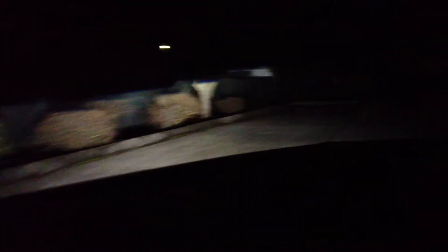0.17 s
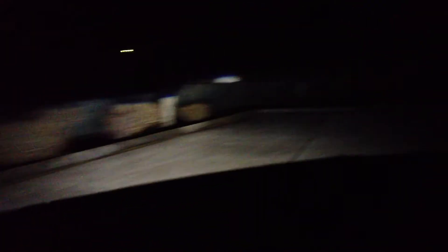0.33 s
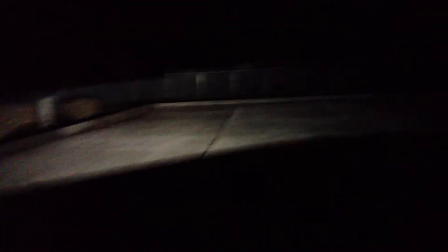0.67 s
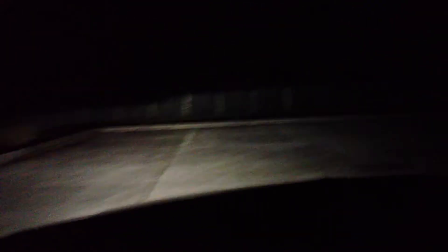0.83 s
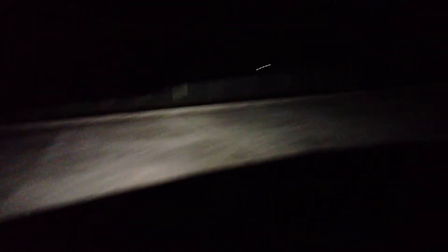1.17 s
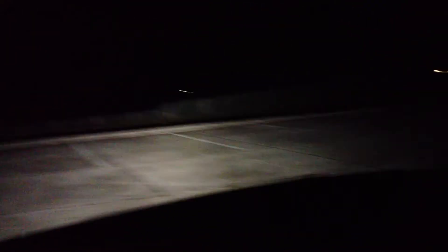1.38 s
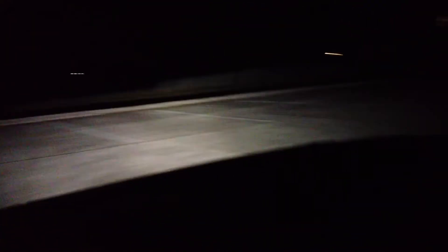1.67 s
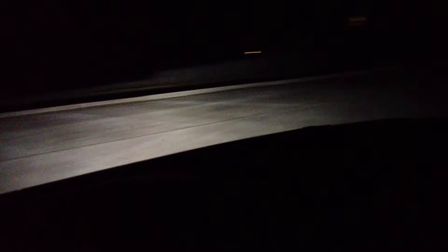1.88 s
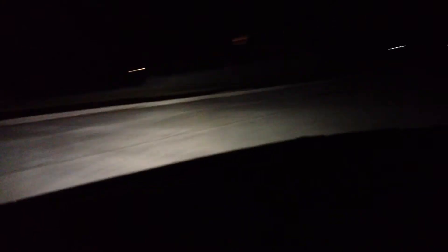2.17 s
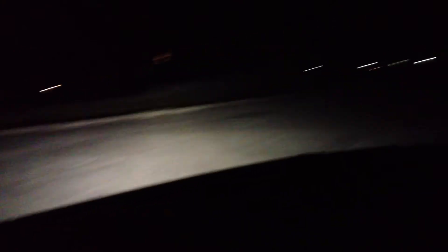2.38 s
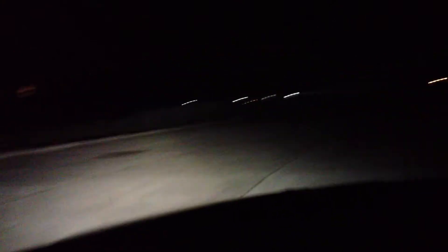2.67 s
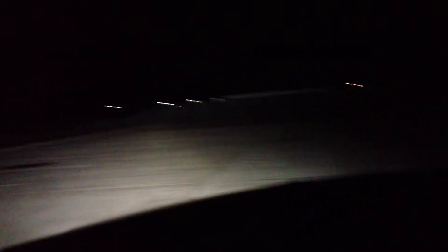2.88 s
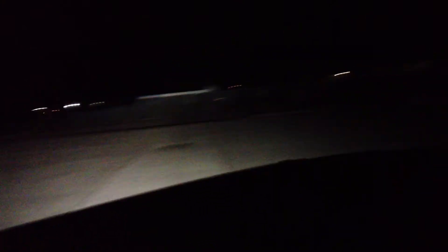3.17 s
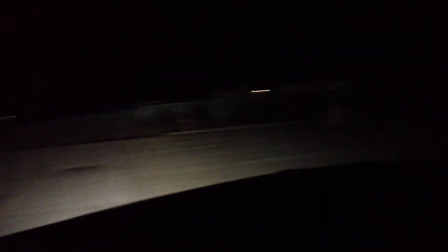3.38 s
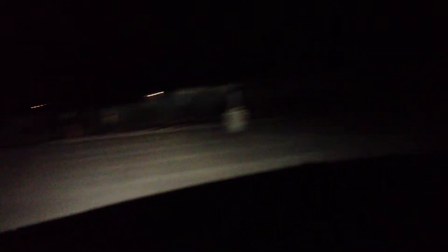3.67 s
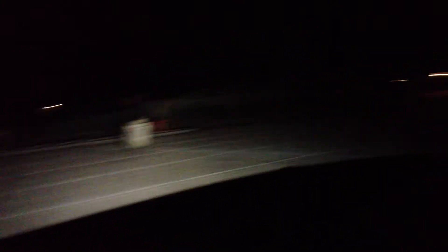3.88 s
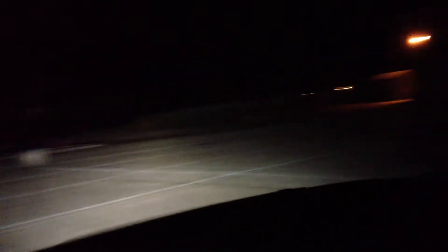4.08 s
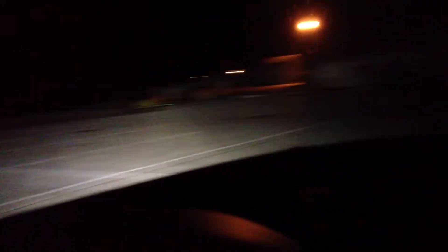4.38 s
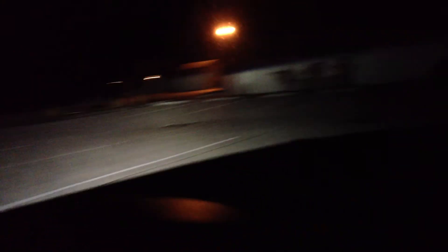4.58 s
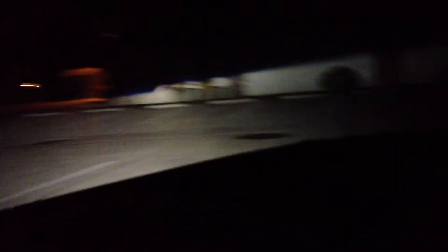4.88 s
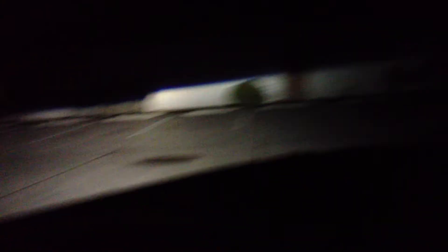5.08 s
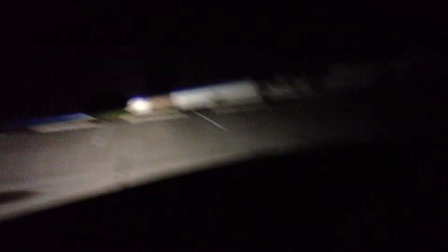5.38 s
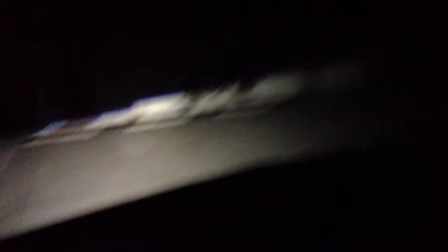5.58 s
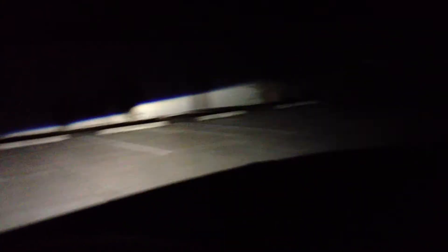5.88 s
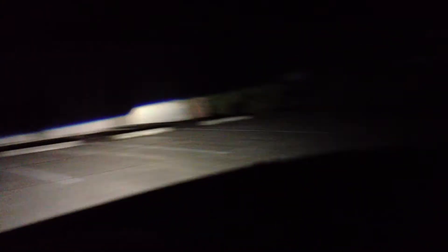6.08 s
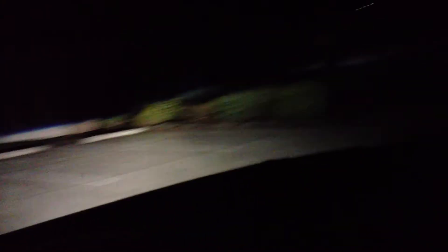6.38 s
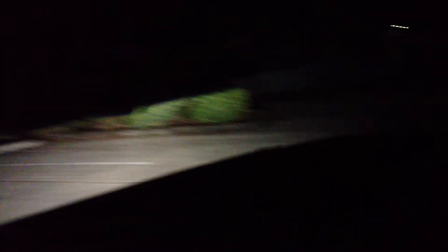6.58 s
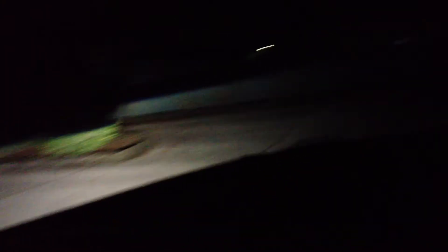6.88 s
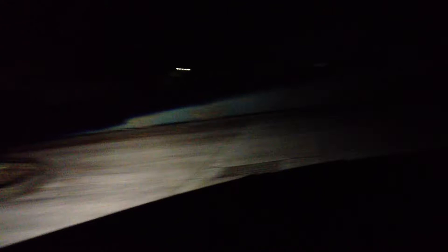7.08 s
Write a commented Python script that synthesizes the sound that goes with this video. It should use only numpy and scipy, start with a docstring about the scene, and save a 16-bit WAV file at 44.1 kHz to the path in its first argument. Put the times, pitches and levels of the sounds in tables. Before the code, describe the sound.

Inside a car circling slowly on concrete, tyres rumble and hiss under the low drone of a worn wheel bearing, which swells, eases and rises slightly in pitch. Early on, hard plastic clacks sharply twice close to the microphone, bouncing and ringing briefly. Loose trim ticks and rattles at irregular intervals, and road seams thud softly through the floor. The drone is strongest near the end.

```python
"""Inside a car circling slowly on concrete. A worn wheel bearing drones in harmonics that follow
the speed, over the boom, roar and hiss of the tyres and a fine high rustle. Road seams thud through
the floor. Loose trim ticks and rattles as the body rolls, among short squeaks and two faint whistles.
Hard plastic clacks sharply near the microphone and rings; the loud clacks duck the recorder's gain."""
import sys
import numpy as np
from scipy import signal
from scipy.fft import rfft, irfft, next_fast_len
from scipy.io import wavfile
from scipy.ndimage import uniform_filter1d

SR = 44100
rng = np.random.default_rng(int(sys.argv[2]) if len(sys.argv) > 2 else 0)


def persist_wave(psi):
    """Save psi, clipped to +-1, as 16-bit WAV."""
    counts = np.round(np.clip(psi, -1, 1) * 32767).astype(np.int16)
    wavfile.write(sys.argv[1], SR, np.atleast_2d(counts).T)


N = 318843
TIME = np.arange(N) / SR
AGE = np.arange(8192) / SR  # seconds since a blow
BINS = np.fft.rfftfreq(len(AGE), 1 / SR)

# The wheel's speed. Each row: time in seconds, the bearing's fundamental in Hz.
WHEEL_SPEED = [(0, 45.3), (1, 44.8), (1.5, 46), (2, 48.4), (3, 51.7), (4.5, 54.8), (6, 54.3), (6.5, 53.3),
               (7.23, 51.4)]
# Tyre hiss and a fine high rustle. Each row: time in seconds, hiss level in dB, rustle level in dB.
TREBLE_LEVELS = [(0, -58.5, -70.5), (.6, -53.5, -62.5), (1.1, -54.5, -64), (1.5, -51, -51),
                 (1.78, -50.5, -55), (2, -56.5, -66.5), (2.5, -59, -69), (3.1, -56.5, -68),
                 (3.7, -55.5, -67.5), (4.05, -54.5, -63.5), (4.6, -54.5, -65.5), (5.5, -54.5, -65),
                 (6.3, -55.5, -64), (7.23, -57, -70)]
# Seams and grit under the tyres. Each row: start in seconds, thud in dB, thud centre in Hz, swell in dB.
JOLTS = [(.02, -59, 500, 12.5), (.228, -65, 500, 4), (.265, -49, 566, 1), (.286, -53, 520, -4),
         (.345, -50.5, 546, 7), (.395, -64, 500, 3.5), (.69, -47, 570, -4), (.76, -54, 516, 1),
         (.85, -56, 420, -2), (1.25, -51, 495, 0.5), (1.51, -42.5, 614, 1.5), (1.9, -49.5, 466, 3.5),
         (2.25, -61, 506, 3.5), (2.43, -51, 517, 0.5), (2.606, -44, 540, 0), (2.77, -55, 570, 1),
         (2.95, -59, 442, 1), (3.16, -55, 523, 2.5), (3.33, -45, 510, 5), (3.39, -54, 556, 7),
         (3.95, -43, 610, -7), (4.05, -48, 440, -1), (4.152, -47, 594, 6), (4.33, -51, 484, 0),
         (4.96, -44.5, 526, 0), (5.607, -46.5, 655, 1), (5.629, -43.5, 530, 1), (6.33, -49.5, 520, -4),
         (7.048, -47, 572, 1.5)]
# Spectrum of small dry contacts. Each row: frequency in Hz, relative level in dB.
RATTLE_SPECTRUM = [(300, -11.5), (750, 5.5), (1800, 6), (3400, 2), (5000, 1), (7700, -7), (9500, -17.5),
                   (15000, -23)]


def gain_of(db):
    """Decibels to amplitude."""
    return 10 ** (np.asarray(db) / 20)


def unit_rms(x):
    """Normalisation to an rms of one."""
    return x / np.sqrt(np.mean(x ** 2) + 1e-20)


def spectrum_db(points, hz):
    """A spectrum in dB, interpolated on a log-frequency axis."""
    known_hz, db = np.transpose(points)
    return np.interp(np.log(hz + 1), np.log(known_hz + 1), db)


def curves(rows):
    """Each column of a time table, interpolated to every sample."""
    times, *columns = np.transpose(rows)
    return [np.interp(TIME, times, column) for column in columns]


def add(mix, start_s, sound):
    """Superposition: a sound joins the mix at start_s."""
    part = mix[round(start_s * SR):][:len(sound)]
    part += sound[:len(part)]


def filtered_noise(response):
    """White noise shaped by an amplitude response, at unit rms."""
    size = next_fast_len(N)
    shaped = rfft(rng.standard_normal(size)) * response(np.fft.rfftfreq(size, 1 / SR))
    return unit_rms(irfft(shaped, size)[:N])


def noise(spectrum):
    """Stationary noise with the given spectrum."""
    return filtered_noise(lambda hz: gain_of(spectrum_db(spectrum, hz)))


def wander(cutoff_hz):
    """Random fluctuation: noise through a Gaussian low-pass."""
    return filtered_noise(lambda hz: np.exp(-(hz / cutoff_hz) ** 2))


def resonance(hz, width_hz):
    """Narrow-band noise, as from a randomly driven resonator whose centre may move."""
    phase = 2 * np.pi * np.cumsum(hz * np.ones(N)) / SR
    return unit_rms(wander(width_hz) * np.cos(phase) + wander(width_hz) * np.sin(phase))


def steadied(x, span_s):
    """Division by the running rms evens the loudness and leaves the fast flutter."""
    size = max(int(span_s * SR), 2)
    return x / np.sqrt(uniform_filter1d(uniform_filter1d(x ** 2, size), size) + 1e-9)


def bell(hz, octaves):
    """A Gaussian peak on the log-frequency axis."""
    return np.exp(-(np.log2((BINS + 1) / hz) / octaves) ** 2)


def treble_tilt(db_per_octave):
    """Spectral slope in dB above 1500 Hz: a harder blow is brighter."""
    return db_per_octave * np.log2(np.maximum(BINS, 1500) / 3000)


def burst(colour_db, t60, hold_s, tail_db, tail_t60):
    """Impulse response of a blow: dense early reflections, exponential decay, the cabin's faint tail."""
    log_gain = np.log(gain_of(np.maximum(colour_db - colour_db.max(), -80)))
    mirrored = np.r_[log_gain, log_gain[-2:0:-1]]
    minimum_phase = np.exp(np.conj(signal.hilbert(mirrored)))[:len(BINS)]
    envelope = gain_of(-60 * np.maximum(AGE - hold_s, 0) / t60) + gain_of(tail_db - 60 * AGE / tail_t60)
    sound = irfft(rfft(rng.choice([-1., 1.], len(AGE)) * envelope) * minimum_phase)
    return sound * np.linalg.norm(envelope) / np.linalg.norm(sound)


def ring(modes, pitch=1, length=1, rough_rad=0):
    """Free vibration: each mode decays at its own rate; a loose part's buzz roughens the phases."""
    hz, db, t60 = np.transpose(modes)[:, :, None]
    jitter = unit_rms(uniform_filter1d(rng.standard_normal((len(hz), len(AGE))), size=200))
    buzz = jitter * rough_rad * np.minimum(AGE / .02, 1)
    cycles = hz * pitch * AGE + rng.random(hz.shape)
    return (gain_of(db - 60 * AGE / (t60 * length)) * np.sin(2 * np.pi * cycles + buzz)).sum(0)


def hiss_and_rustle(flicker_db=1.84, grit_db=-9, grains_per_s=45):
    """Amplitude modulation: tyre hiss flickers with a gritty rustle that swells like a sliding sleeve."""
    # Two noise spectra. Each row: frequency in Hz, relative level in dB.
    hiss_spectrum = [(400, 4.5), (900, 3), (1300, 0), (1800, 0.5), (2500, -4), (3400, -5.5), (4800, -7),
                     (6500, -24), (12000, -46.5)]
    rustle_spectrum = [(2000, -28), (4000, -7.5), (5200, 1), (6300, -1.5), (7600, 0), (8600, -3.5),
                       (9500, -10.5), (11000, -12), (13000, -8.5), (15500, -10.5)]
    hiss_db, rustle_db = curves(TREBLE_LEVELS)
    flicker = flicker_db * wander(23)
    grains = (rng.random(N) < grains_per_s / SR) * gain_of(4 * np.minimum(rng.exponential(1, N), 4))
    grain_envelope = signal.oaconvolve(grains, np.exp(-AGE / .004))[:N]
    grit = unit_rms(grain_envelope * noise(RATTLE_SPECTRUM))
    hiss = gain_of(hiss_db + flicker) * noise(hiss_spectrum)
    return hiss + gain_of(rustle_db + flicker) * (noise(rustle_spectrum) + gain_of(grit_db) * grit)


def tyre_scuffing(scuff_db=-9, patchy_db=3):
    """Roughness excitation: changing road grain swells three bands of the hiss independently."""
    hiss_db, _ = curves(TREBLE_LEVELS)
    bands = sum(resonance(hz, hz / 6) * gain_of(patchy_db * wander(9)) for hz in (1650, 2400, 3400))
    return gain_of(hiss_db + scuff_db) * steadied(bands, span_s=.043)


def jolt_swell(rise_s=.026):
    """Transient loading: each seam briefly raises or lowers the tyre's level, in dB."""
    return sum(db * np.exp(-((TIME - start) / rise_s - 1) ** 2) for start, _, _, db in JOLTS)


def bearing(waver_db=1.8):
    """Periodic contact: the pitted race sounds a fundamental (hum) and harmonics 3 to 6 (drone)."""
    # The fundamental, and the third harmonic, which the cabin amplifies.
    # Each row: time in seconds, level in dB.
    hum_levels = [(0, -57), (.7, -66), (1.35, -66.5), (2.1, -66), (2.7, -58.5), (3.6, -59), (4.3, -58.5),
                  (4.7, -69), (7.23, -68.5)]
    drone_levels = [(0, -50), (.7, -53), (1.4, -48), (1.82, -49), (1.97, -42.5), (2.8, -43.5), (3.3, -50),
                    (3.8, -43.5), (4.4, -42.5), (4.65, -49), (5.05, -38), (5.35, -39.5), (5.65, -36),
                    (6, -39.5), (6.4, -38.5), (6.6, -46), (7.23, -42)]
    (hz,), (hum_db,), (drone_db,) = curves(WHEEL_SPEED), curves(hum_levels), curves(drone_levels)
    phase = 2 * np.pi * np.cumsum(hz) / SR + .08 * wander(8)
    harmonics = sum(gain_of(db) * np.sin(k * phase + rng.uniform(0, 2 * np.pi))
                    for k, db in [(3, 0), (4, -16), (5, -14), (6, -21)])
    hum = np.sqrt(2) * gain_of(hum_db) * np.sin(phase)
    drone = np.sqrt(2) * gain_of(drone_db + waver_db * wander(9)) * harmonics
    return hum, drone


def rolling(throb_db=.5, rough_db=2, panel_throb_db=4.5, throb_hz=14):
    """Forced vibration: drone, growl and boom throb with wheel load; the tread roars and stirs panels."""
    # The changing road. Each row: time in seconds, then boom, growl, roar and panel levels in dB.
    road_levels = [(0, -42, -47.5, -51, -63), (.4, -41, -39.5, -43.5, -51), (.55, -39.5, -42.5, -47.5, -50),
                   (.82, -38, -45, -41, -56), (1.05, -38.5, -44, -46, -50.5), (1.4, -39, -37, -47.5, -51),
                   (1.85, -40, -51, -41.5, -45), (2.1, -39, -44, -45.5, -51), (2.5, -43, -46, -48.5, -50.5),
                   (3, -40, -41.5, -43.5, -50), (3.35, -45.5, -51, -45, -49),
                   (3.7, -41, -39.5, -45.5, -47.5), (4.15, -42, -39.5, -41.5, -51),
                   (4.65, -40.5, -44, -44.5, -47.5), (5.15, -39, -40.5, -45.5, -49.5),
                   (5.7, -40.5, -39, -43.5, -51), (6.05, -44.5, -41, -49, -50.5),
                   (6.45, -41.5, -36.5, -47.5, -55.5), (6.75, -40, -44, -45.5, -52),
                   (7.23, -40, -42, -45, -52.5)]
    # Tyre noise spectra. Each row: frequency in Hz, relative level in dB.
    boom_spectrum = [(20, -39.5), (40, -33), (65, -27), (85, -13.5), (105, -10.5), (125, 1.5), (138, -1),
                     (152, -10), (178, -3), (192, -5.5), (210, -16.5), (260, -37), (500, -84)]
    roar_spectrum = [(120, -32), (200, -3.5), (240, -0.5), (280, 3.5), (330, -1), (370, -9.5), (460, -19.5),
                     (680, -16), (900, -20.5), (1300, -42), (3000, -70)]
    # Tread bands that beat with the drone.
    # Each row: multiple of the bearing's fundamental, width in Hz, relative level in dB.
    growl_bands = [(3.22, 7, 0), (3.47, 4, -7), (5.27, 5, -12)]
    # Body panel resonances. Each row: centre in Hz, width in Hz, relative level in dB.
    panel_modes = [(399.5, 45, 3.5), (492, 30, -4.5), (585, 43, -2), (736, 120, -8)]
    (hz,) = curves(WHEEL_SPEED)
    boom_db, growl_db, roar_db, panel_db = curves(road_levels)
    load_db = jolt_swell() + throb_db * wander(throb_hz)
    shake_db = .22 * load_db + rough_db * wander(throb_hz)  # rough patches shake roar and panels together
    hum, drone = bearing()
    tread = sum(gain_of(db) * resonance(k * hz, width) for k, width, db in growl_bands)
    growl = gain_of(growl_db - 1) * steadied(tread, span_s=.12)
    boom = gain_of(boom_db) * steadied(noise(boom_spectrum), span_s=.14)
    roar = gain_of(roar_db - .5 + shake_db) * steadied(noise(roar_spectrum), span_s=.068)
    flexing = sum(gain_of(db + panel_throb_db * wander(throb_hz)) * resonance(centre, width)
                  for centre, width, db in panel_modes)
    panels = gain_of(panel_db - .5 + shake_db) * steadied(flexing, span_s=.11)
    return hum + gain_of(load_db) * (drone + growl + boom) + roar + panels


def seam_thuds():
    """Structure-borne sound: road seams thud through the floor."""
    out = np.zeros(N)
    for start, db, hz, _ in JOLTS:
        thud = burst(45 * bell(hz, octaves=.6), t60=.09, hold_s=.018, tail_db=-12, tail_t60=.16)
        add(out, start, gain_of(db) * thud)
    return out


def rattles(lift_db=10, faint_count=8, faint_until_s=5.2):
    """Light impacts: small things rattle about the cabin in broadband bursts, fainter ones at random."""
    # Each row: start in seconds, level in dB, tilt in dB per octave, t60 in seconds, stressed band in Hz.
    contacts = [(0.361, -47, 1.5, 0.13, 4200), (0.4895, -47, 8, 0.045, 2170), (.537, -57, 9, .025, 7500),
                (.59, -55.5, -1, 0.07, 2230), (1.046, -43, -4.5, 0.073, 930), (1.052, -45, 5, 0.038, 3580),
                (1.1245, -45.5, 1.5, 0.043, 1500), (1.271, -50.5, 3.5, .07, 2500),
                (1.412, -44, -1.5, 0.14, 2240), (2.041, -48, 0, 0.078, 2770), (2.07, -48.5, -6.5, .05, 700),
                (2.598, -47, -2, 0.1, 2870), (2.612, -45.5, -3.5, 0.098, 930),
                (2.789, -56, -0.5, 0.12, 3300), (2.9317, -49.5, 5, 0.024, 2540),
                (3.03, -46.5, 11, 0.055, 4970), (3.093, -55, 4.5, 0.096, 2880),
                (3.293, -48, -2.5, 0.19, 1590), (3.3736, -47, 4, 0.13, 1640),
                (3.416, -47.5, -1.5, 0.093, 1050), (3.956, -41, -4, 0.092, 1640),
                (4.0535, -44.5, -4.5, 0.037, 840), (4.152, -43, -3, 0.068, 1000),
                (4.158, -50, 14, .04, 1500), (4.8728, -41, -3, 0.046, 2470), (4.969, -51, -3, 0.15, 3020),
                (5.489, -49, 4.5, 0.067, 1730), (5.6063, -42, -1, 0.05, 1500),
                (5.656, -49.5, -2, 0.044, 1510), (6.74, -47.5, -2, 0.036, 5040),
                (7.058, -52.5, -5, 0.037, 690)]
    faint = [((k + when) / faint_count * faint_until_s, -57 + 4 * size, -1, .038, 1500 * 3 ** where)
             for k, (when, size, where) in enumerate(rng.random((faint_count, 3)))]
    out = np.zeros(N)
    for start, db, tilt, t60, hz in contacts + faint:
        colour = spectrum_db(RATTLE_SPECTRUM, BINS) + treble_tilt(tilt) + lift_db * bell(hz, octaves=.21)
        add(out, start, gain_of(db) * burst(colour, t60, hold_s=.0024, tail_db=-14.5, tail_t60=.48))
    return out


def squeaks_and_whistles(rough_rad=.9, rough_hz=350):
    """Phase jitter roughens short stick-slip squeaks, and two faint, very high whistles near 3 s."""
    # Each row: start and length in seconds, level in dB, middle pitch in Hz, glide in octaves.
    tones = [(.343, .014, -52, 3800, 0), (.347, .016, -43, 1680, -.15), (.359, .035, -47, 3580, -.03),
             (.489, .014, -45, 2200, -.06), (1.144, .085, -49, 1440, 0), (3.008, .04, -63, 15150, 0),
             (3.092, .024, -60, 15150, 0), (5.204, .014, -46, 2100, 0)]
    out = np.zeros(N)
    jitter = rough_rad * wander(rough_hz)
    for start, length, db, hz, glide in tones:
        progress = np.arange(0, 1, 1 / (length * SR))
        pitch_hz = hz * 2 ** (glide * (progress - .5))
        phase = 2 * np.pi * np.cumsum(pitch_hz) / SR + jitter[round(start * SR):][:len(progress)]
        envelope = np.sin(np.pi * np.sqrt(progress)) ** 2
        add(out, start, np.sqrt(2) * gain_of(db) * envelope * np.sin(phase))
    return out


def trim_ticks(ring_db=-4, rebound_db=-10):
    """Impact and rebound: a loose panel snaps, rings briefly and lands again, softer and lower."""
    # Each row: start in seconds, level in dB, pitch factor, ring time factor, relative snap level in dB.
    taps = [(1.1438, -36, 1.02, 1, -26), (1.162, -40, 1, 1, -30), (1.1857, -40, 1, 1.2, -30),
            (1.9945, -35.5, 1, 1.2, -21), (2.1859, -38.5, .88, .8, -20), (2.2538, -34, 1.03, 1, -24),
            (2.5386, -34.5, 1, .9, -21), (2.576, -35, 1.02, 1, -27), (2.6429, -33.5, 1.02, 1.1, -29),
            (2.871, -41, .9, .7, -16), (3.1981, -33, 1, 1.25, -21), (3.296, -43, 1.1, .8, -22),
            (3.5992, -31.5, 1, 1, -15), (3.9424, -32, 1.06, .85, -11), (4.4104, -31, 1, .9, -13.5),
            (5.0903, -30.5, .98, 1.15, -15), (5.5243, -29.5, .96, 1.15, -13)]
    # The hollow panel's modes. Each row: frequency in Hz, relative level in dB, t60 in seconds.
    trim_modes = [(760, -14, .025), (1040, -7, .04), (1150, 0, .05), (1410, -2, .06), (1610, -1.5, .035),
                  (1900, -1, .024)]
    # The contact snap. Each row: frequency in Hz, relative level in dB.
    snap_spectrum = [(300, -14), (1000, 1), (2000, 2), (2600, -3), (3800, -8), (5500, -4), (7300, -5),
                     (9500, -16), (15000, -15)]
    out = np.zeros(N)
    attack = np.minimum(AGE / .0005, 1)
    for start, db, pitch, length, snap_db in taps:
        snap = burst(spectrum_db(snap_spectrum, BINS), t60=.045, hold_s=.002, tail_db=-20, tail_t60=.1)
        # each tap lands on another spot, which shifts the mix of modes
        modes = np.add(trim_modes, rng.standard_normal((len(trim_modes), 3)) * [25, 1, 0])
        ringing = attack * ring(modes, pitch, length, rough_rad=1)
        add(out, start, gain_of(db) * (gain_of(ring_db) * ringing + gain_of(snap_db) * snap))
        flight_s = rng.uniform(.005, .009)
        rebound = attack * ring(modes, .96 * pitch, length, rough_rad=1.2)
        add(out, start + flight_s, gain_of(db + ring_db + rebound_db) * rebound)
    return out


def plastic_clacks():
    """Impulsive excitation: hard plastic snaps and bounces with bright cracks, and its modes ring on."""
    # Each row: start in seconds, crack level in dB, tilt in dB per octave, t60 in seconds,
    # stressed band in Hz, its lift in dB, ringing level in dB.
    blows = [(1.4615, -21, -3, 0.035, 1930, 14, -48), (1.4622, -21.5, -2.5, 0.02, 4850, 24, -40),
             (1.5143, -32, -3.5, 0.15, 2100, 2, -37), (1.564, -8, 5, 0.06, 7300, 2.5, -27),
             (1.6185, -32.5, 0.5, 0.07, 2380, 7.5, -34), (1.653, -34.5, -1, 0.15, 780, 10, -46),
             (1.727, -50, 0, .15, 2300, 3, -52), (1.7996, -21, 3.5, 0.04, 660, 15, -18.5),
             (1.8035, -22, 2, .03, 4200, 8, -36), (1.8145, -16.5, 1.5, 0.04, 2250, 8, -24),
             (1.829, -26, -.5, 0.11, 2900, 7, -31)]
    # The crack. Each row: frequency in Hz, relative level in dB.
    crack_spectrum = [(100, -28), (450, -21), (700, -12.5), (880, -9), (1100, -3), (1400, -5.5), (2000, -2),
                      (3300, -4), (4800, -2.5), (6000, -4), (7700, -0.5), (9400, -15), (13000, -15.5),
                      (15500, -18)]
    # The part's modes. Each row: frequency in Hz, relative level in dB, t60 in seconds.
    plastic_modes = [(640, -9, .09), (743, -12, .1), (1085, -9, .09), (1147, -12, .12), (1390, -14, .08),
                     (1570, -9, .08), (1809, -13, .14), (1890, -10, .09), (2112, -1, .12), (2258, 1, .13),
                     (2595, -11, .13), (2772, -12, .12), (2842, -10, .13), (2988, -8, .23),
                     (3060, -11, .11), (4135, -2, .09), (4307, -4, .085), (4651, -8, .095), (4835, -7, .11),
                     (5114, -6, .11), (5810, -7, .09), (5943, -8, .06), (6700, -7, .095), (6960, -5, .08),
                     (7267, -11, .15), (7895, -7, .11), (8699, -14, .12)]
    out = np.zeros(N)
    for start, db, tilt, t60, hz, lift_db, ring_db in blows:
        colour = spectrum_db(crack_spectrum, BINS) + treble_tilt(tilt) + lift_db * bell(hz, octaves=.14)
        add(out, start, gain_of(db) * burst(colour, t60, hold_s=.004, tail_db=-21, tail_t60=.2))
        add(out, start, gain_of(ring_db) * ring(plastic_modes, rough_rad=.23))
    return out


def scene():
    """Superposition of all sources at the front seat, in one channel."""
    bed = rolling() + hiss_and_rustle() + tyre_scuffing()
    return (bed + plastic_clacks() + trim_ticks() + squeaks_and_whistles() + rattles() + seam_thuds())[None]


def record(dry, threshold_db=-24, ratio=4, attack_s=.034, recover_db_per_s=20, cutoff_hz=15500):
    """Compression: gain control ducks the cabin after loud clacks and recovers slowly; then a low-pass."""
    power_db = 10 * np.log10(abs(uniform_filter1d(dry[0] ** 2, size=530)) + 1e-12)
    recovery_db = recover_db_per_s * TIME
    held_db = np.maximum.accumulate(power_db + recovery_db) - recovery_db  # peaks fall at a steady rate
    excess_db = np.maximum(held_db - threshold_db, 0)
    pole = np.exp(-1 / (attack_s * SR))
    duck_db = (1 - 1 / ratio) * signal.lfilter([1 - pole], [1, -pole], excess_db)
    low_pass = signal.firwin(301, cutoff_hz, window=("kaiser", 9), fs=SR)
    return signal.oaconvolve(dry * gain_of(-duck_db), low_pass[None], "same")


dry = scene()
out = record(dry)
persist_wave(out)
```